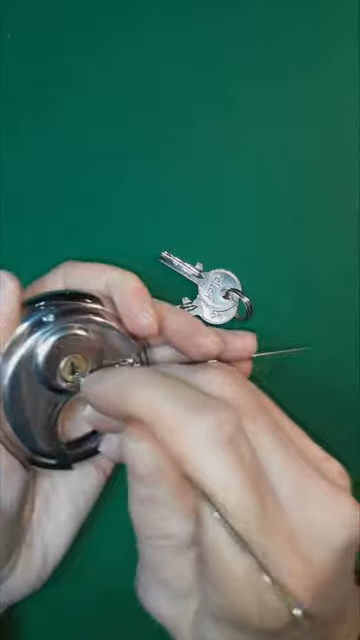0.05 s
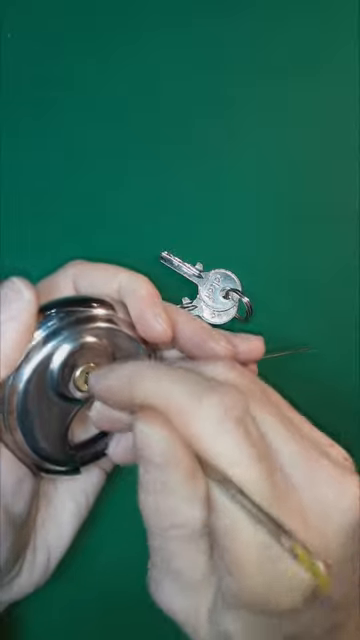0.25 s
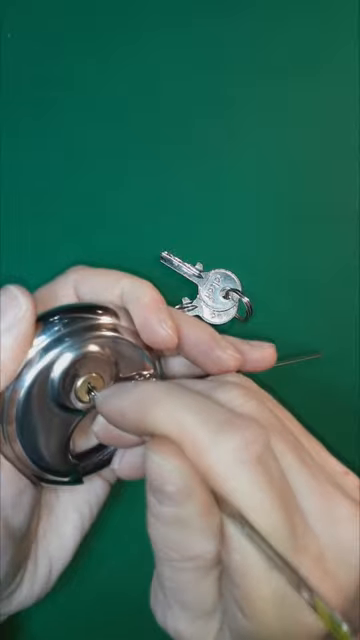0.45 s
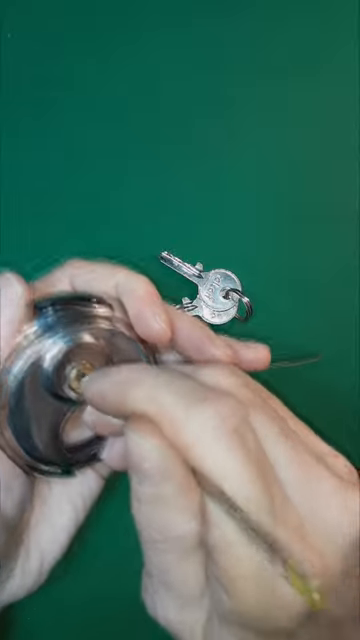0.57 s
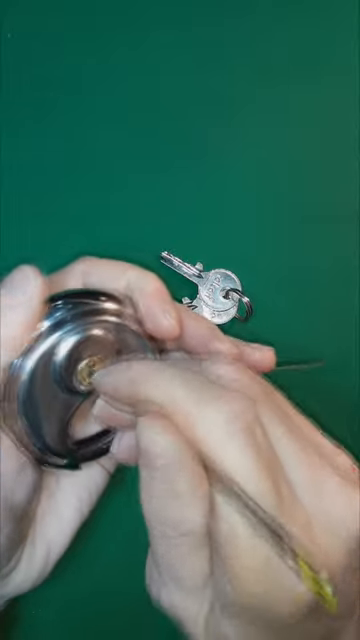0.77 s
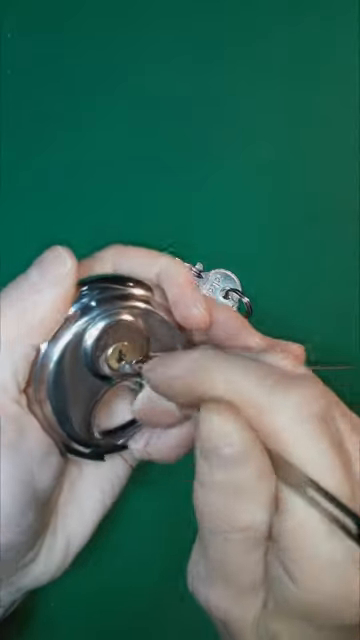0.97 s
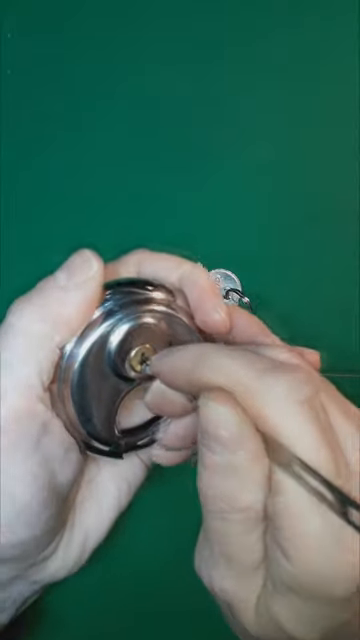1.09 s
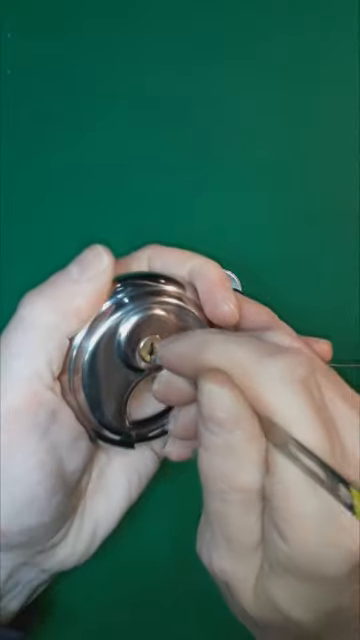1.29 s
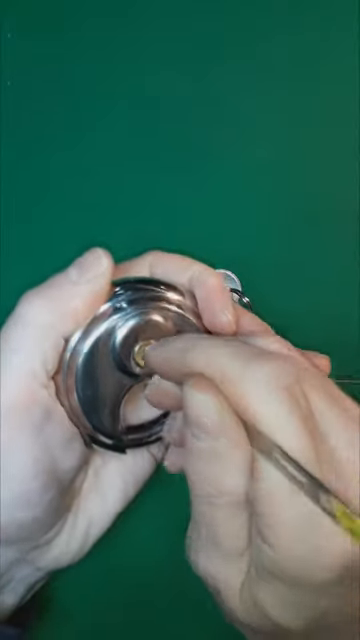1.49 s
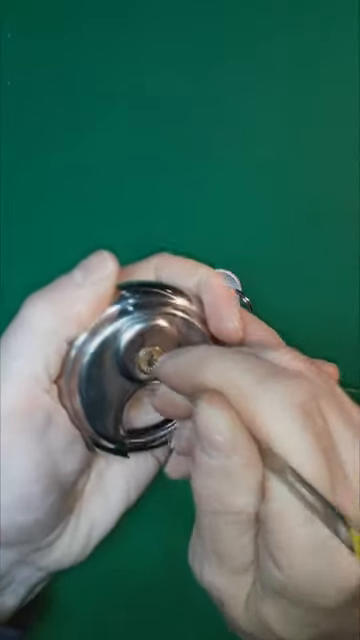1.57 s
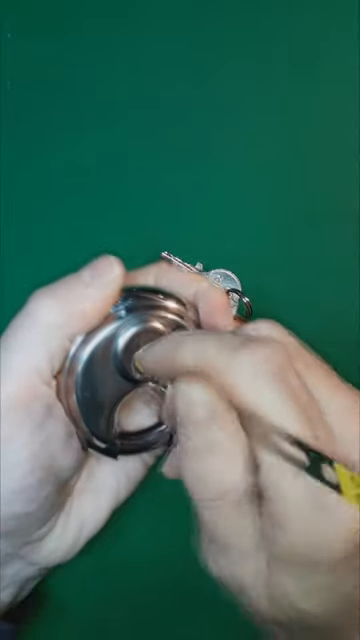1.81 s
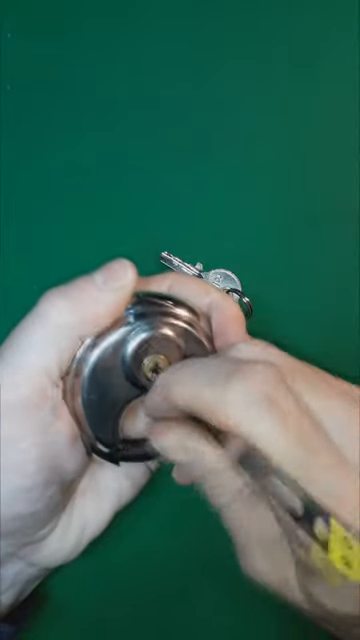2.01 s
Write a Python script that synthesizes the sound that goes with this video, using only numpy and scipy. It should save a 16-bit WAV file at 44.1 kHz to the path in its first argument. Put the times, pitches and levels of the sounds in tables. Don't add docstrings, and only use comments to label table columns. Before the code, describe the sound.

Close, dry metallic clicks from a lock being picked, starting with a loud snap and short ring, then faint ticks, a rattly flurry, one more hard click and soft sliding, in a small room.

```python
import sys
import numpy as np
from scipy import signal
from scipy.fft import rfft, irfft
from scipy.io import wavfile
from scipy.ndimage import uniform_filter1d

SR = 44100
rng = np.random.default_rng(int(sys.argv[2]) if len(sys.argv) > 2 else 0)


def boost_factor(decibels):
    exponent = np.asarray(decibels, float) / 20
    return 10 ** exponent


def materialize(psi):
    bounded = np.clip(np.atleast_2d(psi).T, -1, 1)
    quanta = np.round(bounded * 32767).astype(np.int16)
    wavfile.write(sys.argv[1], SR, quanta)


N = 90404


def rms_one(x):
    return x / np.sqrt(np.mean(x ** 2) + 1e-20)


def smooth(x, size):
    return uniform_filter1d(uniform_filter1d(x, size=size), size=size)


def ring(force, hz, t60):
    r = boost_factor(-60 / (max(t60, 0.002) * SR))
    w = 2 * np.pi * hz / SR
    return signal.lfilter([0, np.sin(w)], [1, -2 * r * np.cos(w), r * r], force + 1e-18)


def coloured(points, flicker_db):
    hz, db = np.transpose(points)
    bins_hz = np.arange(N // 2 + 1) * SR / N
    shape = boost_factor(np.interp(np.log(bins_hz + 1), np.log(hz), db))
    flicker = rms_one(smooth(rng.standard_normal(N), 90))
    grains = rng.standard_normal(N) * boost_factor(flicker_db * flicker)
    return rms_one(irfft(rfft(grains) * shape, N))


def follow(points):
    s, db = np.transpose(points)
    return np.interp(np.arange(N) / SR, s, db)


def add(out, s, x):
    i = int(s * SR)
    out[i:i + len(x)] += x[:len(out) - i]


def pick_slide():
    # (time [s], level [dB])
    slide_level = [(0, -69), (.09, -90), (.16, -67.5), (0.362, -63.5), (.55, -71.5), (0.702, -77),
                   (.76, -96.5), (.85, -82), (.95, -64.5), (1.16, -74), (1.21, -74), (1.381, -81),
                   (1.5, -66), (1.65, -60.5), (1.76, -53), (1.92, -63), (2.05, -58.5)]
    # (frequency [Hz], density [dB per Hz])
    slide_colour = [(700, -36.5), (1400, -5), (2900, -4), (3800, -7.5), (4500, -3), (7400, -8.5),
                    (8800, -33), (16000, -21.5)]
    trim_db, grain_db = -1, -0.5
    return boost_factor(follow(slide_level) + trim_db) * coloured(slide_colour, grain_db)


def table_rumble():
    # (time [s], level [dB])
    grip_level = [(0.0, -72), (0.03, -65.5), (0.16, -72.5), (0.25, -54.5), (0.29, -66), (0.39, -74),
                  (0.93, -84), (1.08, -75), (1.25, -92), (1.57, -65.5), (1.59, -71), (2.05, -71.5)]
    # (frequency [Hz], density [dB per Hz])
    rumble_colour = [(25, -30), (55, -12), (90, 0), (150, -6), (190, -22), (300, -45), (600, -70)]
    trim_db = -0.8
    return boost_factor(follow(grip_level) + trim_db) * coloured(rumble_colour, flicker_db=0.5)


def gate_db(x):
    shut_db, slope, release_db_per_s = -70, 0.5, 301.5
    level = 10 * np.log10(uniform_filter1d(x ** 2, size=600) + 1e-12)
    ramp = release_db_per_s * np.arange(N) / SR
    held = np.maximum.accumulate(level + ramp) - ramp
    return slope * uniform_filter1d(np.clip(held - shut_db, 0, 40), size=400)


def room_floor(action):
    # (frequency [Hz], density [dB per Hz])
    floor_colour = [(60, -40), (200, -26), (500, -26), (1500, -32), (7500, -30), (9000, -34), (16000, -34)]
    floor_db = -76.5
    return boost_factor(floor_db + gate_db(action)) * coloured(floor_colour, flicker_db=1.0)


def contacts():
    # (time [s], body peak [dB], pin peak [dB], pin pitch [Hz], chatter
    # length [ms])
    contact_events = [(0.005, -27.5, -35, 5900, 0.84), (0.0072, -33, -28, 5340, 2.3),
                      (0.108, -51.5, -35.5, 5530, 1.7), (0.203, -50.5, -43, 6400, 5.2),
                      (0.213, -21, -21, 5230, 5.9), (0.2196, -21.5, -22, 5600, 3.1),
                      (0.229, -13.5, -11, 4900, 0.65), (0.244, -22.5, -23, 5050, 5.5),
                      (0.3262, -33.5, -32.5, 5740, 3.2), (0.351, -56.5, -45.5, 6080, 1.2),
                      (0.5724, -48, -41, 5770, 1), (0.598, -31.5, -34, 5220, 1.94),
                      (0.662, -48.5, -44, 5620, 2.3), (0.6677, -39.5, -39.5, 4390, 1.66),
                      (0.86, -50.5, -45.5, 6720, 0.85), (0.881, -29.5, -33.5, 4700, 0.55),
                      (0.9418, -43, -36.5, 7000, 3.8),
                      (0.975, -41, -44.5, 5040, 0.4), (0.98, -33.5, -27.5, 5070, 4.1),
              (0.991, -28.5, -27, 5730, 0.52), (0.9944, -39, -24, 6240, 0.45),
              (1.009, -25.5, -27.5, 5500, 0.39), (1.04, -42, -43, 6800, 1.1),
              (1.053, -41.5, -43, 6540, 2.8), (1.069, -32.5, -28, 5950, 4.6),
              (1.0798, -23, -26, 5650, 0.36), (1.088, -37, -23, 6060, 1.4),
              (1.0922, -21.5, -27, 6000, 1.44), (1.158, -64, -46.5, 5440, 1.4),
              (1.2724, -48, -41.5, 5520, 4), (1.3097, -41.5, -43, 6760, 3), (1.392, -53.5, -42, 6670, 1.6),
              (1.4239, -29, -22.5, 6440, 2.8),
                      (1.4352, -26.5, -20, 6600, 3.26), (1.4608, -28, -23, 6040, 0.91),
                 (1.51, -41, -34, 7300, 3), (1.518, -26, -28, 5430, 5.7), (1.528, -29.5, -26, 4760, 4.5),
                 (1.536, -23, -19.5, 4540, 1.9), (1.5391, -6.5, -18.5, 6800, 1.04),
                 (1.558, -51, -41, 5700, 2.5), (1.5976, -42, -36.5, 6360, 4.4),
                 (1.7305, -40.5, -47, 6300, 0.93), (1.7772, -25.5, -30, 4670, 1.32),
                 (1.9393, -32, -33.5, 5100, 2), (1.9468, -63, -40, 4380, 3.1), (1.976, -40, -55, 5100, 1.1),
                 (1.982, -41.5, -39.5, 7600, 2.9), (1.995, -39.5, -45, 6200, 1.77),
                 (2.037, -49, -75, 5600, 2.1)]
    # (frequency [Hz], level [dB])
    body_modes = [(1300, -43.5), (1850, -32), (2160, -23), (2780, 27.5), (2950, -0.5), (3150, 14),
                  (3450, -14.5)]
    # (frequency [Hz], level [dB])
    pin_modes = [(4390, 7), (4750, 1), (5200, 0), (5800, 1.5), (6400, 3.5), (6850, 3), (7410, 4)]
    # (frequency [Hz], level [dB])
    tip_modes = [(9600, -12), (10800, -19.5), (11800, 9.5), (12600, -9.5), (13600, 9.5), (14700, 6.5),
                 (15600, -9)]
    mode_t60_s = (.007, .006, .002)
    tip_db, pin_spread_oct, mode_chance_db = -15.5, 0.53, 2.5
    width_share = 0.31
    approach_db, approach_ms = -24, 3.6
    settle_db, settle_ms, settle_grain_db = -18, 7.3, 2.5
    low_cut_hz, pin_low_cut_hz, shell_top_hz = 1668, 2300, 7800

    out = np.zeros(N)
    rows = contact_events
    t_ms = np.arange(2600) * 1000 / SR - 4.5
    shell = signal.butter(4, shell_top_hz, fs=SR, output="sos")
    thin = signal.butter(2, pin_low_cut_hz, "high", fs=SR, output="sos")
    for s, body_db, pin_db, pin_hz, ms in rows:
        grit = rng.standard_normal((4, len(t_ms)))
        luck = rng.standard_normal((3, 7))
        a = np.maximum(t_ms, 0) / (width_share * ms)
        lumps = boost_factor(settle_grain_db * rms_one(smooth(grit[3], 50)))
        approach = boost_factor(approach_db) * np.exp(-np.abs(t_ms) / approach_ms)
        settle = boost_factor(settle_db) * (1 - np.exp(-a)) * np.exp(-t_ms / settle_ms)
        swell = 2.01 * (1 - np.exp(-(a / 1.14) ** 4)) * np.exp(-a / 2.1)
        chatter = swell + lumps * (approach + settle)
        parts = [(body_modes, body_db), (pin_modes, pin_db), (tip_modes, pin_db + tip_db)]
        for k, (modes, peak_db) in enumerate(parts):
            y = np.zeros(len(t_ms))
            for j, (hz, mode_db) in enumerate(modes):
                level = mode_db + mode_chance_db * luck[k, j]
                if k == 1:
                    level -= 6 * (np.log2(hz / pin_hz) / pin_spread_oct) ** 2
                tone = ring(chatter * grit[k], hz, mode_t60_s[k] * np.sqrt(ms))
                y += (-1) ** j * boost_factor(level) * tone
            if k != 2:
                y = signal.sosfilt(shell, y)
            if k != 0:
                y = signal.sosfilt(thin, y)
            add(out, max(s + t_ms[0] / 1000, 0), boost_factor(peak_db) * y / np.abs(y).max())
    return signal.sosfilt(signal.butter(4, low_cut_hz, "high", fs=SR, output="sos"), out)


def room(x):
    room_db, room_t60_s, wall_cut_hz = -13.5, 0.16, 16000
    t = np.arange(SR // 3) / SR
    tail = rng.standard_normal(len(t)) * boost_factor(-60 * t / room_t60_s) * np.clip(t / 0.0019, 0, 1)
    tail = signal.lfilter([1], [1, -np.exp(-2 * np.pi * wall_cut_hz / SR)], tail)
    return boost_factor(room_db) * signal.fftconvolve(x, tail / np.sqrt(np.sum(tail ** 2)))[:N]


def snaps():
    # (time [s], frequency [Hz], level [dB], half width [ms])
    snap_events = [(.008, 2930, -26.5, 0.71), (0.2219, 5200, -15, 1.22), (0.2299, 3123, -1, 0.78),
                   (.2298, 1980, -20.5, 1.04), (0.2395, 3170, -20, 1.1), (0.2464, 3400, -19, 0.82),
                   (.251, 2900, -21, 1.1), (0.256, 3130, -21.5, 1.3), (0.8811, 2570, -35, 0.32),
                   (.598, 11420, -48.5, 1), (0.9697, 6500, -49, 0.67), (1.1094, 2900, -41, 2.6),
                   (1.1189, 2880, -42, 1.8), (1.561, 2780, -46, 2.1), (1.564, 2840, -47, 0.92),
                   (1.748, 7370, -45, 2.1), (1.7782, 2277, -25, 0.19), (0.6707, 2860, -33.5, 1.4),
                   (1.540, 2820, -10.5, 0.25)]
    out = np.zeros(N)
    t = np.arange(-350, 350) / SR
    for s, hz, db, ms in snap_events:
        swell = np.exp(-(1000 * t / ms) ** 2)
        add(out, s + t[0], boost_factor(db) * swell * np.sin(2 * np.pi * hz * t))
    return out


def free_rings():
    # (time [s], frequency [Hz], level [dB], t60 [s], stopped after [s])
    ring_events = [(.02, 6360, -62.5, 0.58, 0.14), (0.232, 2855, -34, 0.1, .2),
                   (0.231, 3090, -26, 0.11, .2), (0.574, 2830, -54, 0.047, .03),
                   (.598, 2795, -46, 0.07, 0.03), (0.671, 2910, -55, 0.093, 0.16),
                   (.688, 1084, -64.5, 0.17, 0.019), (0.881, 2828, -49, 0.12, 0.03),
                   (1.1, 2912, -43, 0.2, .095), (1.0926, 2880, -19, 0.022, 0.04),
                   (1.093, 11700, -50, 0.1, .035), (1.314, 2915, -62, 0.5, 0.09),
                   (1.392, 2900, -58, .1, .03), (1.542, 7413, -22, 0.021, .03),
                   (1.539, 11880, -33, 0.039, 0.037), (1.542, 2775, -34, 0.086, .08),
                   (1.276, 2900, -62, .4, .03), (1.94, 2930, -52, 0.12, 0.05)]
    flutter_db, wander_hz = 4.5, 22
    out = np.zeros(N)
    t = np.arange(SR // 4) / SR
    for s, hz, db, t60, stop in ring_events:
        rocking = smooth(rng.standard_normal(len(t)), 130)
        edges = np.clip(np.minimum(t / 0.0007, (stop - t) / 0.003), 0, 1)
        flutter = flutter_db * np.tanh(rms_one(rocking)) * np.minimum(t / 0.01004, 1)
        pitch = hz + wander_hz * rms_one(rocking[::-1])
        tone = np.sin(2 * np.pi * np.cumsum(pitch) / SR)
        add(out, s, boost_factor(db - 60 * t / t60 + flutter) * edges * tone)
    return out


def palm_knocks():
    # (time [s], frequency [Hz], level [dB], t60 [s])
    knock_events = [
        (0.2, 425, -51.5, 0.21),
        (.212, 800, -51.5, 0.21),
        (.235, 1100, -52.5, 0.57),
        (0.24, 90, -56.5, 0.18),
        (1.1, 120, -67, 0.11),
    ]
    out = np.zeros(N)
    t = np.arange(SR // 4) / SR
    for s, hz, db, t60 in knock_events:
        hum = rms_one(ring(rng.standard_normal(len(t)), hz, 9.9 / hz))
        add(out, s, boost_factor(db - 60 * t / t60) * (1 - np.exp(-t * hz)) * hum)
    return out


def grinds():
    # (time [s], level [dB], t60 [s])
    grind_events = [
        (.231, -33, .14),
        (1.094, -51, .17),
        (1.01, -52, .08),
        (.6, -63, .2),
        (1.541, -48, .12),
    ]
    # (frequency [Hz], density [dB per Hz])
    grind_colour = [(500, -29), (1100, -7.5), (2000, -2.5), (3100, -1.5), (3800, -8), (5200, -3.5),
                    (7400, -8), (8600, -32)]
    t = np.arange(N) / SR
    level = np.zeros(N)
    for s, db, t60 in grind_events:
        level += boost_factor(db - 60 * np.maximum(t - s, 0) / t60) * (t > s)
    return level * coloured(grind_colour, flicker_db=3.0)


def scene():
    lock = contacts() + snaps()
    action = lock + room(lock) + free_rings() + palm_knocks() + pick_slide() + grinds()
    return (action + room_floor(action) + table_rumble())[None]


def low_pass(x):
    return signal.sosfilt(signal.butter(12, 16650, fs=SR, output="sos"), x)


def record(dry):
    top_cut = signal.cheby2(12, 70, 17000, fs=SR, output="sos")
    mix = signal.sosfilt(top_cut, dry)
    return low_pass(mix)


dry = scene()
out = record(dry)
materialize(out)
```